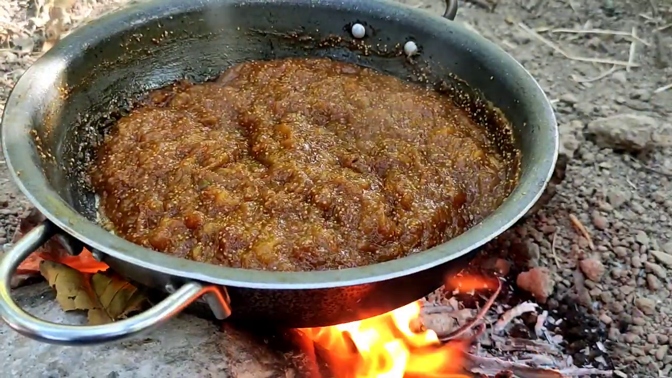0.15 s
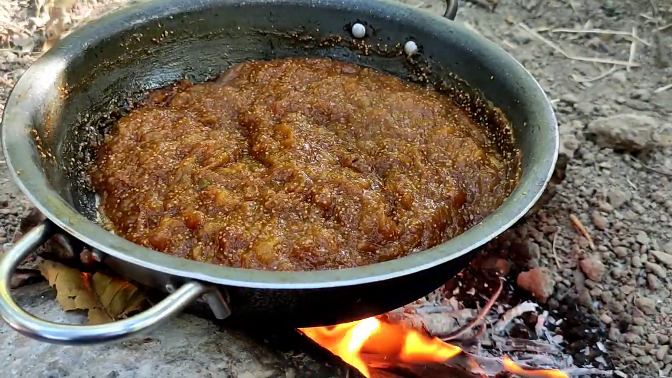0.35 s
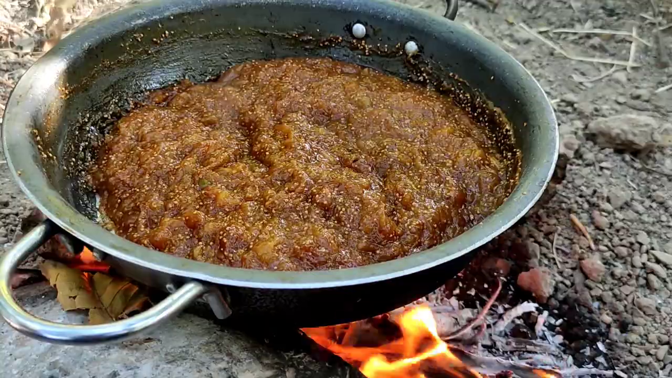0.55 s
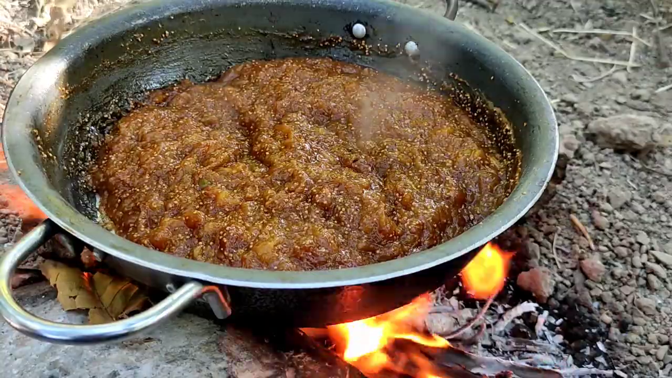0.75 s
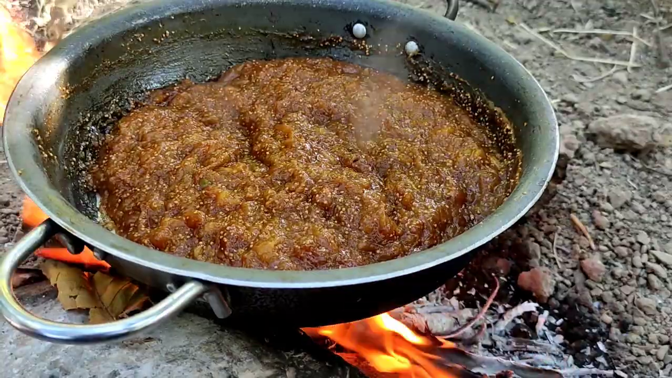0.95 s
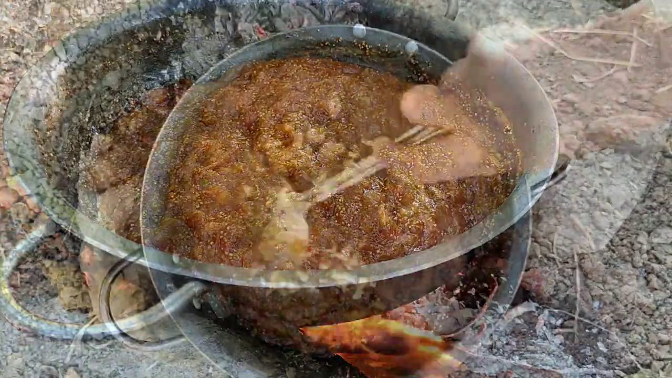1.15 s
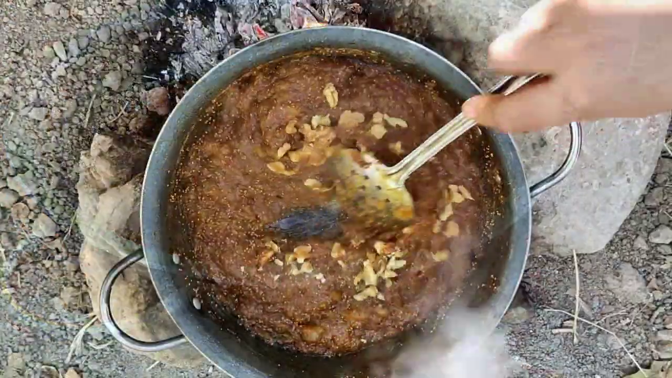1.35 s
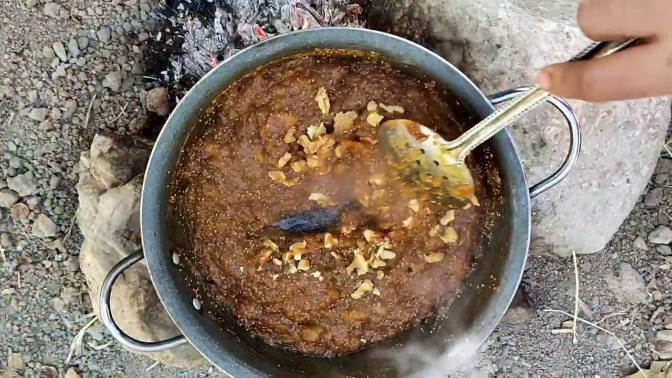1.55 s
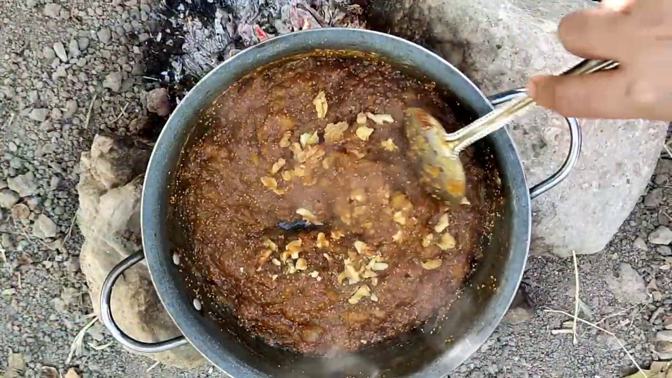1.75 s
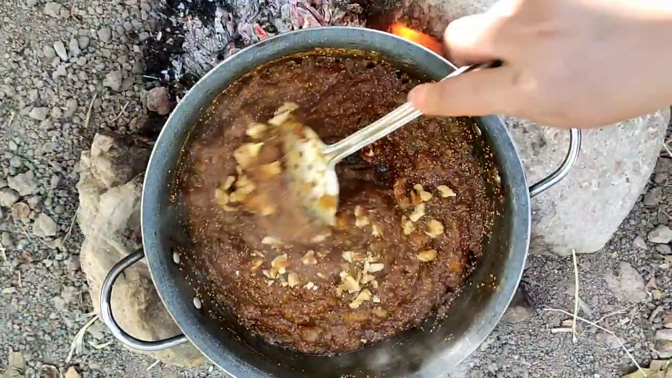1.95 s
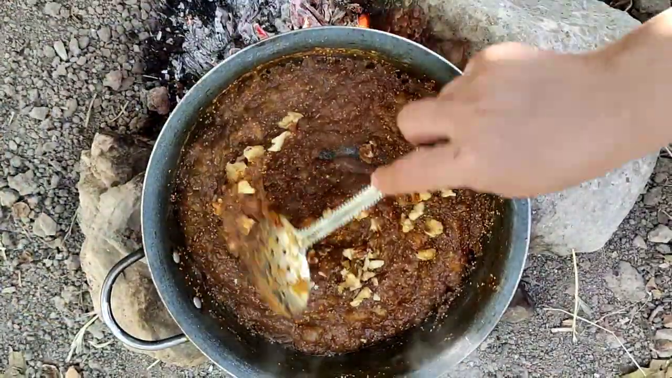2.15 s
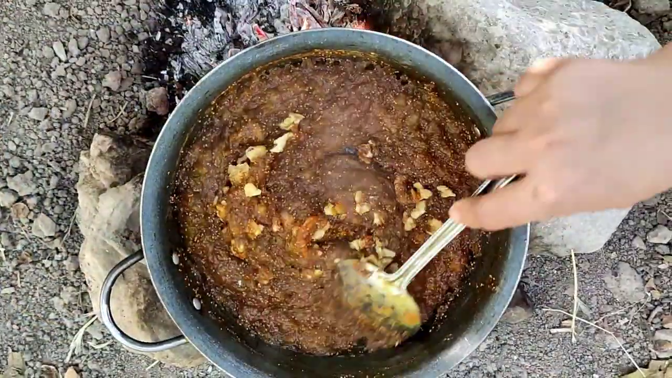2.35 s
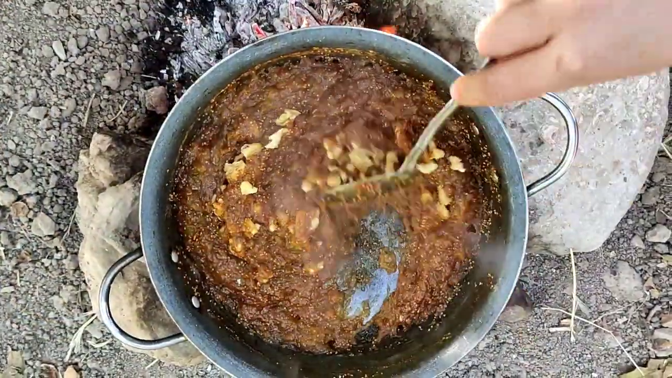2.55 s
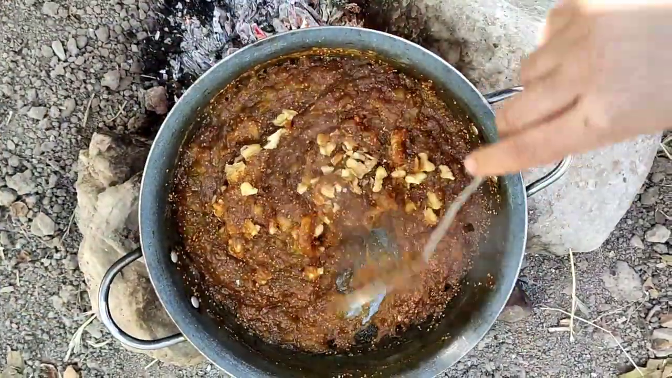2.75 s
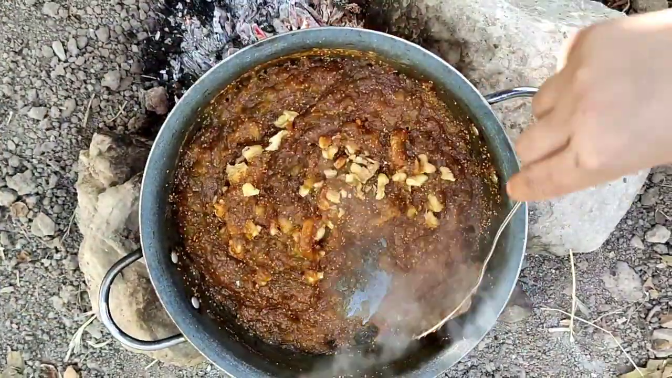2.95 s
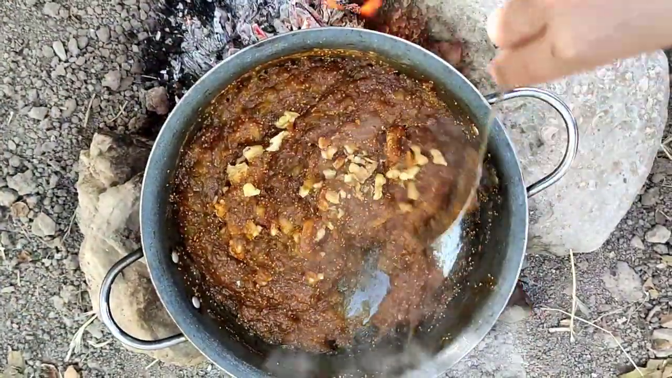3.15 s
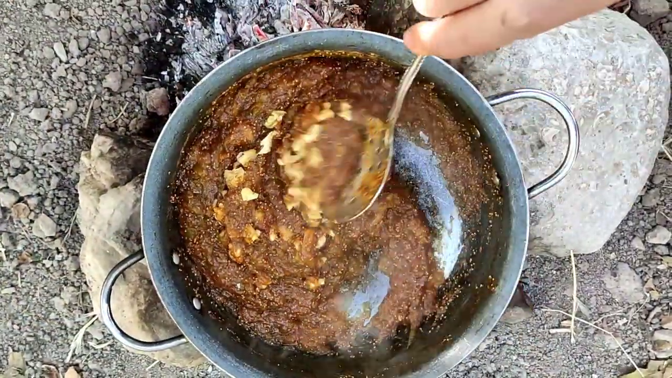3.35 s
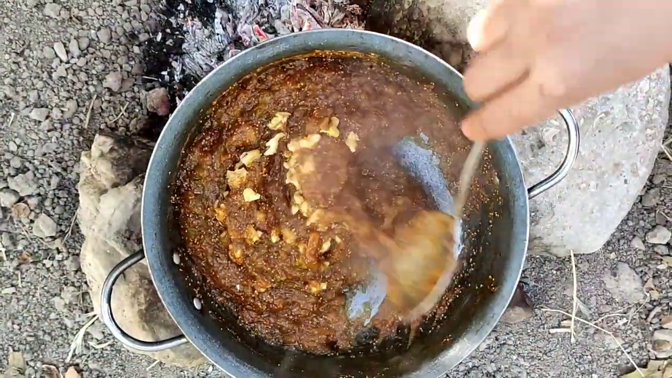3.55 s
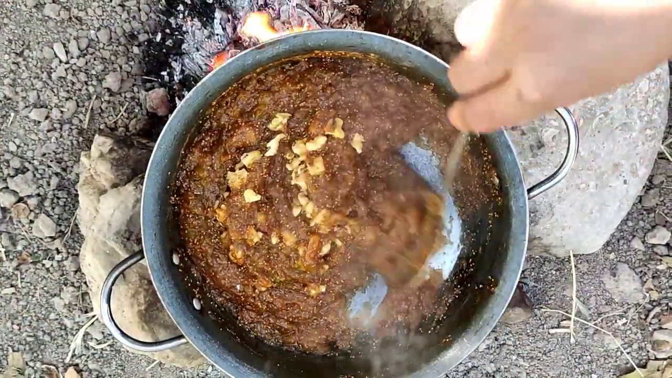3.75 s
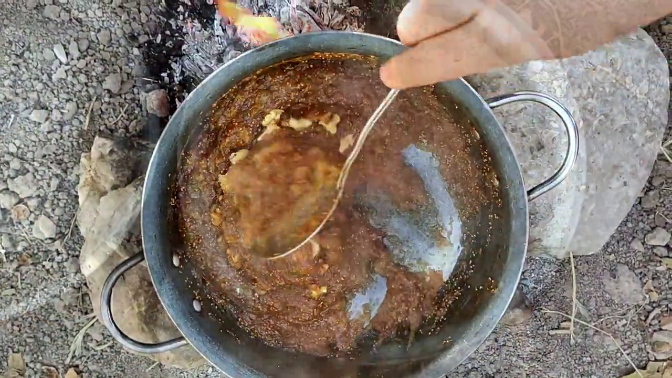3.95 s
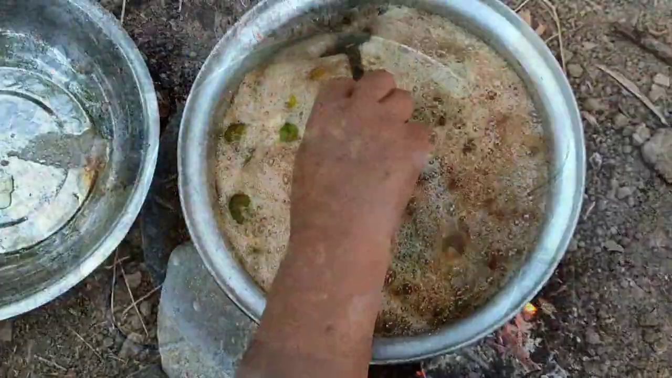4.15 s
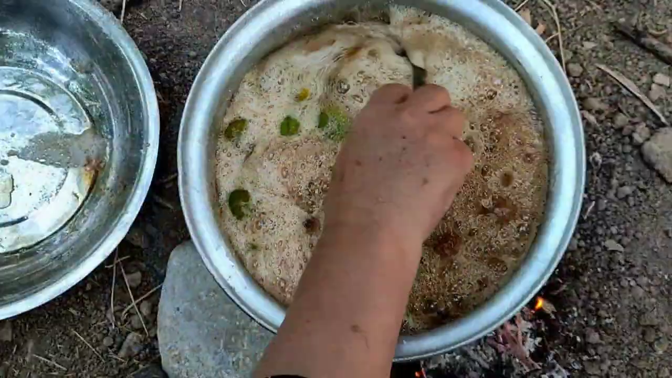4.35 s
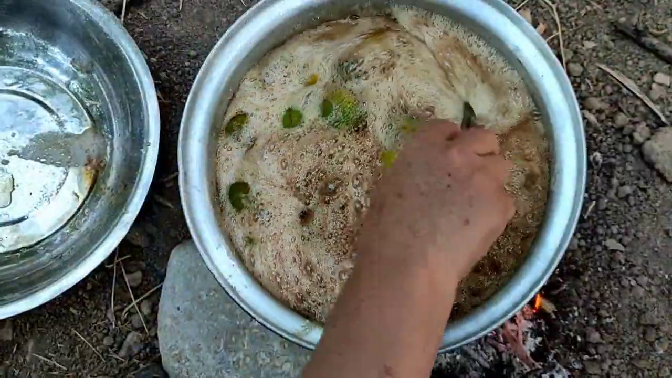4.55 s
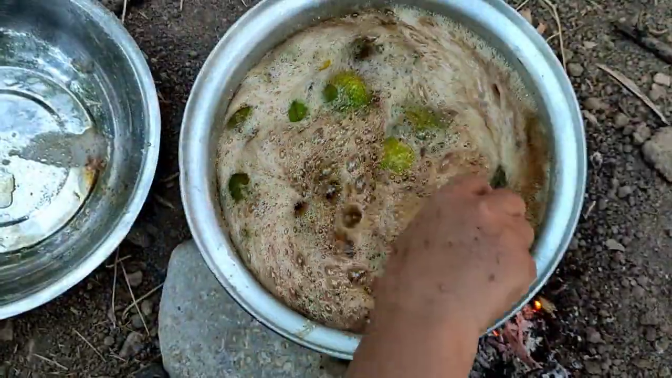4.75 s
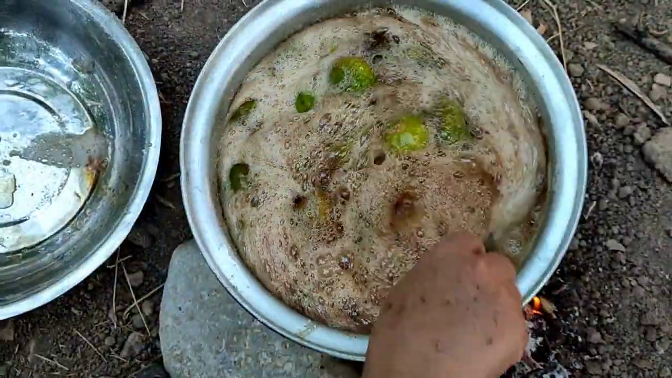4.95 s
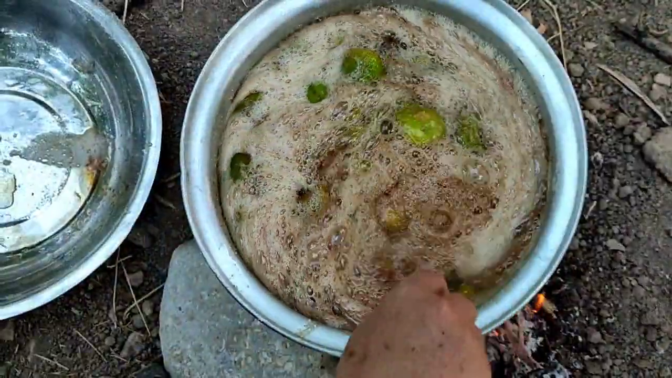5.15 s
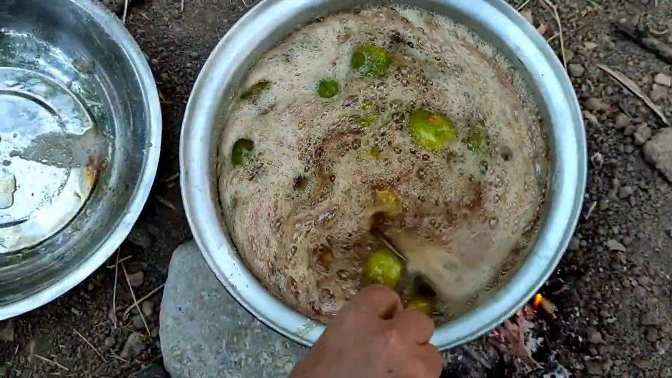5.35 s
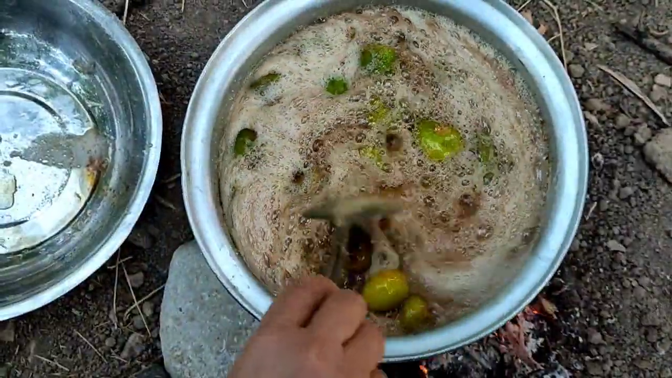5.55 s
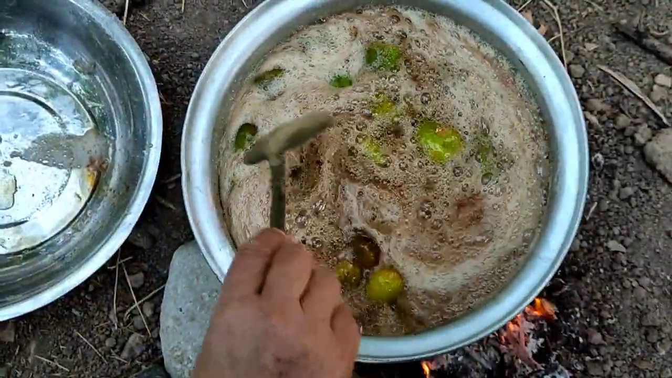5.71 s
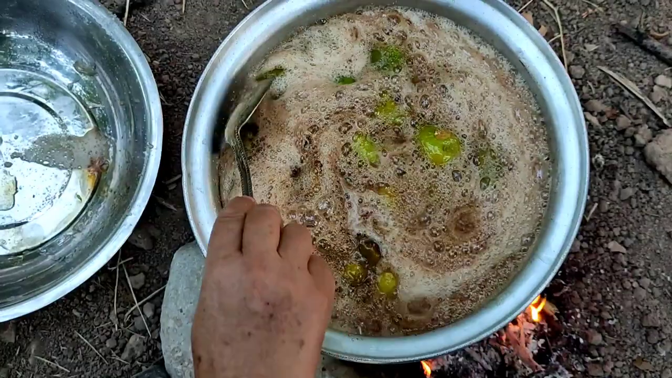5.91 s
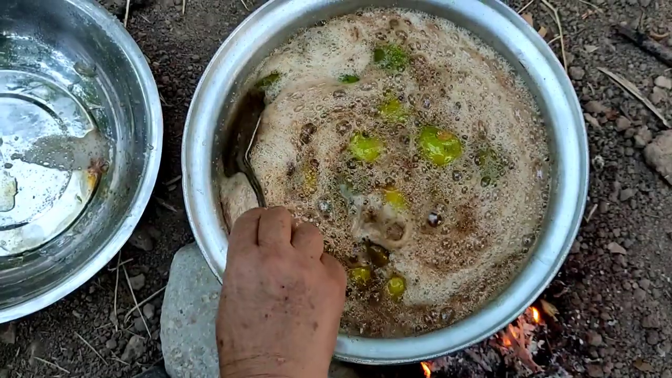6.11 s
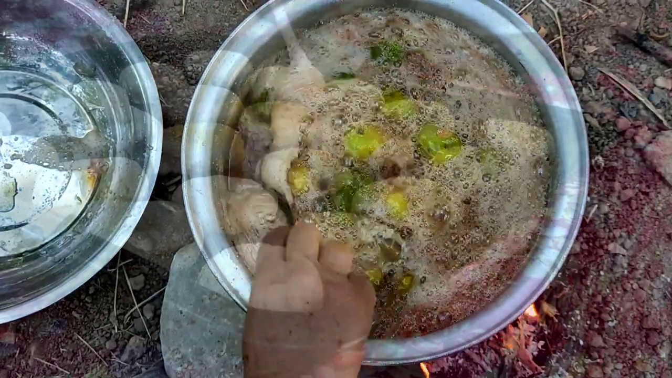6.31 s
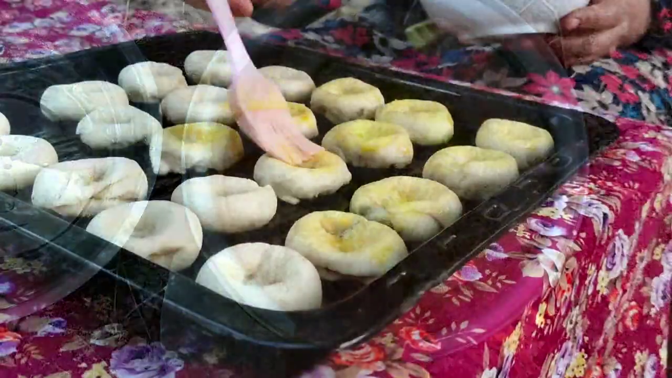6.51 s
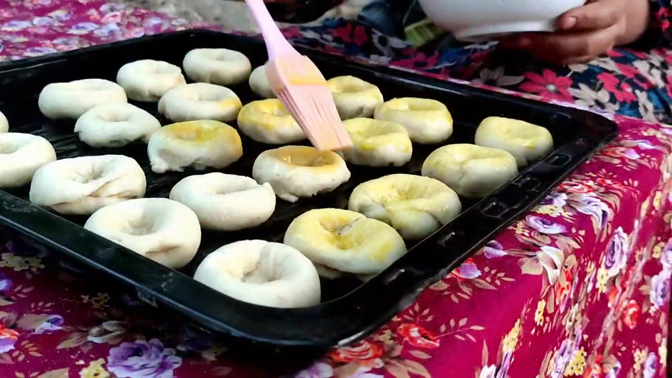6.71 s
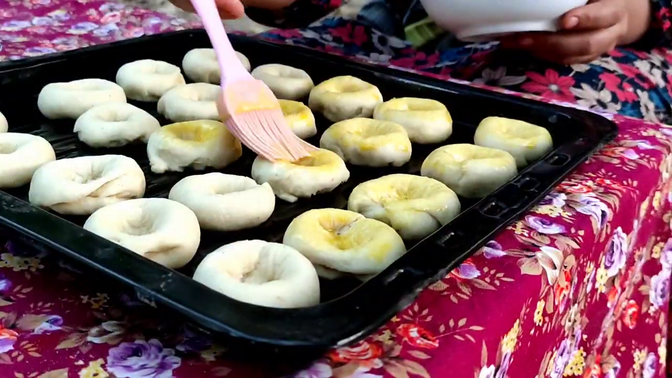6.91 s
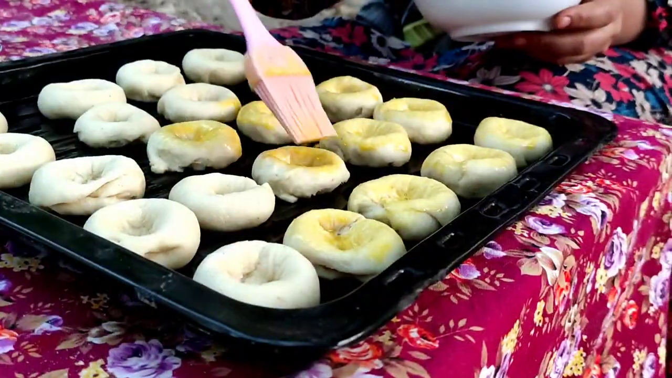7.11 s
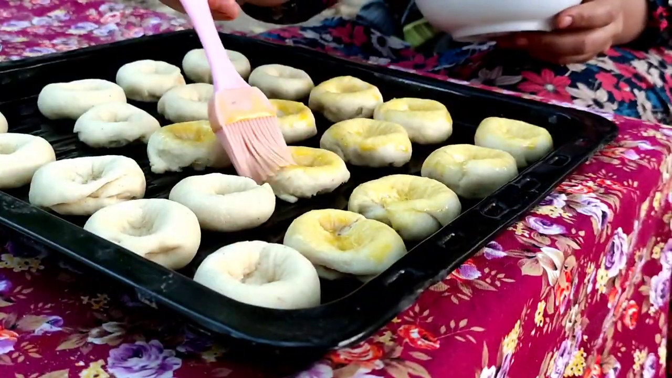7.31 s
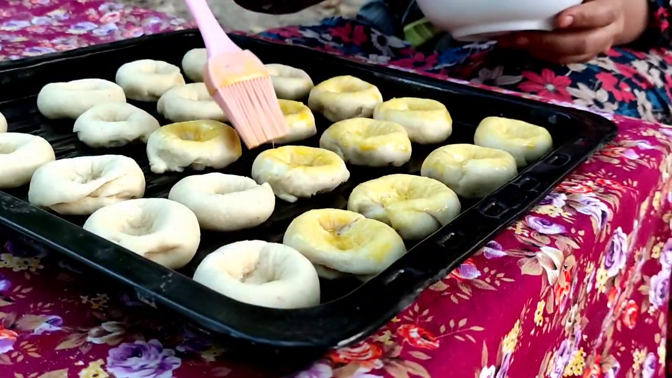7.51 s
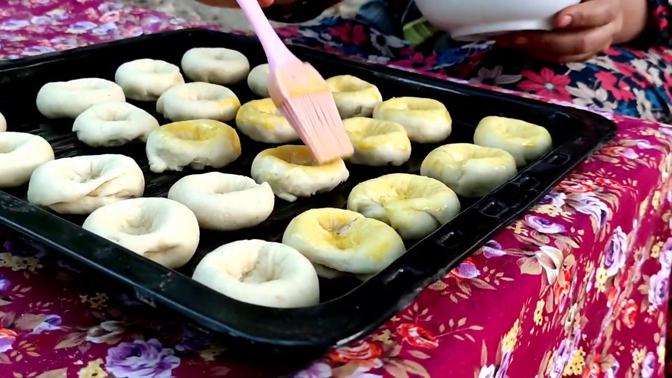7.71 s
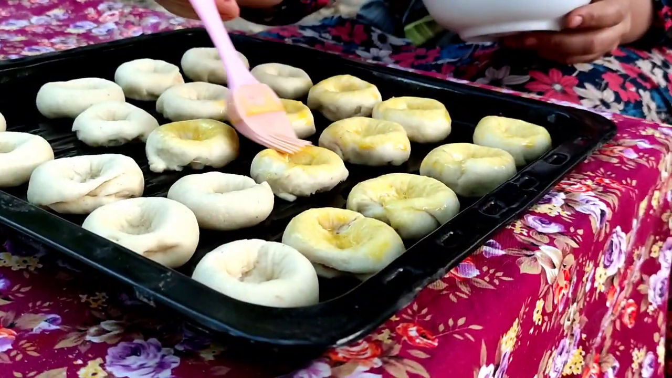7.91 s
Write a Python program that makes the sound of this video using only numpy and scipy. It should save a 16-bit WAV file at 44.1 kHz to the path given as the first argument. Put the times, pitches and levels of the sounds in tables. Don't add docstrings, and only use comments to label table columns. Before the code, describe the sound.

A steady, grainy simmer with low plops and a loud crackle opens, close and dry in open air. Spoon stirring follows: brighter sizzle, short dull thuds with hard metallic edges, rough scrapes and steam squeaks. Next comes softer foam fizz, with quick ticks, knocks and a brief singing rim touch. It ends in a low, barely audible rustle of soft bristles on dough. Near stereo pickup with coarse, watery treble.

```python
import sys
import numpy as np
from scipy import signal
from scipy.fft import rfft, irfft, next_fast_len
from scipy.io import wavfile
from scipy.ndimage import uniform_filter1d

SR = 44100
rng = np.random.default_rng(int(sys.argv[2]) if len(sys.argv) > 2 else 0)


def elevation(decibels):
    levels = np.asarray(decibels, float)
    return 10 ** (levels / 20)


def generate_wav(sig):
    pcm = np.round(np.clip(np.atleast_2d(sig).T, -1, 1) * 32767).astype(np.int16)
    wavfile.write(sys.argv[1], SR, pcm)


N = 355887

# start [s], end [s], fade-in [s], fade-out [s]
STIR_TIMES = (1.2, 4.36, .2, 0.62)
# (pitch [Hz], level [dB per Hz])
STIR_COLOUR = [(18, -68.5), (30, -19), (115, -4), (319, -4), (449, -12.5), (666, 0), (1010, -12),
               (1320, -8), (1960, -13.5), (3220, -7), (6400, -14), (7400, -21), (9000, -13), (12000, -10.5),
               (16000, -29.5)]
FOAM_COLOUR = [(18, -53.5), (30, -21), (98, 2), (355, -3), (526, -9.5), (1040, -14.5), (1910, -19),
               (5170, -18), (5590, -18), (9460, -19), (12000, -20.5), (14800, -23.5), (16000, -46.5)]
# (pitch [Hz], left minus right [dB])
STIR_SIDE = [(60, -2.5), (130, 0), (290, 0), (640, 0.5), (1410, -2), (3100, -3), (6820, 4.5), (15000, 16.5)]
FOAM_SIDE = [(60, 2), (180, -0.5), (550, 0.5), (1650, -0.5), (4970, -3), (15000, 9.5)]
# (pitch [Hz], likeness [1 = same])
LIKENESS = [(40, 0.3), (150, 0.8), (380, 0.8), (950, 0.73), (2380, 0.086), (5980, 0.0), (15000, -0.2)]


def at_hz(points, hz):
    points = np.array(points)
    return np.interp(np.log(hz + 1), np.log(points[:, 0]), points[:, 1])


def drift(rate, size):
    knot_rate = 400
    knots = rng.standard_normal(int(size * knot_rate / SR) + 802)
    r = np.exp(-2 * np.pi * np.clip(rate, 1, 150) / knot_rate)
    slow = signal.lfilter([1], [1, -2 * r, r * r], knots)[800:]
    return np.interp(np.arange(size) * knot_rate / SR, np.arange(len(slow)), slow / slow.std())


def band(x, low_hz, high_hz):
    return signal.sosfilt(signal.butter(2, [low_hz, high_hz], "band", fs=SR, output="sos"), x)


def resonate(x, peaks):
    out = 0
    for k, (hz, width, peak_db) in enumerate(peaks):
        r = np.exp(-1.55 * np.pi * width / SR)
        stage = [1 - r, 0, r - 1, 1, -2 * r * np.cos(2 * np.pi * hz / SR), r * r]
        out = out + (-1) ** k * elevation(peak_db) * signal.sosfilt([stage, stage], x)
    return out


def decay(hz, t60, t):
    return np.sin(2 * np.pi * hz * t) * elevation(-60 * t / t60)


def left_right(noises, hz):
    mid, across = noises
    alike = np.clip(at_hz(LIKENESS, hz), 0, 1)
    return np.sqrt(1 + alike) * mid + np.sqrt(1 - alike) * across * [[1], [-1]]


def swell(t):
    # (centre [s], half width [s], level [dB])
    surges = [(0.019, 0.16, 5), (.64, 0.16, 4.5), (1.55, .15, 2), (1.95, .15, 4), (2.51, 0.16, 4.5),
              (3.248, .11, 11), (3.86, .2, 3), (4.55, 0.17, 3), (5.08, .16, 4), (6.55, .12, 4),
              (7.62, .12, 6), (8.05, 0.1, 5)]
    return sum(db * np.exp(-((t - s) / width) ** 2) for s, width, db in surges)


def view(span, rest, colour, peaks, side, grain_db, patchy_db):
    zones_hz = [170, 800, 3500, 11000]
    start, end, fade_in, fade_out = span
    first, last = int(start * SR), min(int(end * SR), N)
    size = next_fast_len(last - first)
    t, hz = (first + np.arange(size)) / SR, np.fft.rfftfreq(size, 1 / SR)
    gain = elevation(at_hz(colour, hz)) * (hz > 20)
    for peak_hz, width, peak_db in peaks:
        gain *= 1 + (elevation(peak_db) - 1) / (1 + (2 * (hz - peak_hz) / width) ** 2)
    noises = rfft(rng.standard_normal((2, size)) * elevation(grain_db * drift(120, size)))
    lean = elevation(at_hz(side, hz) / 2)
    sound = gain * left_right(noises, hz) * [lean, 1 / lean]

    zone = np.searchsorted([60, 450, 1800, 7000, 15500], hz)
    power = 2 * np.bincount(zone, np.abs(sound.mean(0)) ** 2)[1:5] / size ** 2
    rest_db, follows = np.transpose(rest)[..., None]
    change_db = rest_db + follows * swell(t) - 10 * np.log10(power)[:, None]

    out, together = np.zeros((2, N + size)), drift(3.4, size)
    for centre in 30 * 2 ** np.arange(0, 9.6, .5):
        share = np.clip(1 - 2 * np.abs(np.log2((hz + 1) / centre)), 0, 1)
        place = np.interp(np.log(centre), np.log(zones_hz), range(4))
        level_db = np.clip(1 - np.abs(place - np.arange(4)), 0, 1) @ change_db
        flicker_db = patchy_db * (0.72 * together + drift(14, size))
        out[:, first:first + size] += irfft(sound * share, size) * elevation(level_db + flicker_db)

    clock = np.arange(N) / SR
    rise = np.clip((clock - first / SR) / fade_in + (first == 0), 0, 1)
    fall = np.clip((last / SR - clock) / fade_out + (last > N - 999), 0, 1)
    return out[:, :N] * (rise * fall) ** 0.79


def cracks(hits, middle, bright, middle_db, crack_db, rise):
    force, t = np.full((2, 2, N + 2600), 1e-18), np.arange(2600) / SR
    for s, top_db, mid_db, pan_db in hits:
        t60 = max(.0095 + .00005 * top_db, rise)
        noise = rng.standard_normal((2, 2, len(t))) * (1 - np.exp(-(t / rise) ** 2)) * elevation(-60 * t / t60)
        noise /= np.abs(noise).max(axis=2, keepdims=True)
        noise[..., int(rise * SR)] += 1.5
        levels_db = np.array([[mid_db + 6, mid_db + 8], [top_db + pan_db / 2, top_db - pan_db / 2]])
        at = int(s * SR)
        force[..., at:at + len(t)] += noise * elevation(levels_db)[..., None]
    ring = elevation(middle_db) * resonate(force[0], middle) + elevation(crack_db) * resonate(force[1], bright)
    return ring[:, :N]


def thuds(blows, body, main_t60, contact):
    out, t = np.full(N, 1e-18), np.arange(4000) / SR
    for s, main_db, main_hz, rim_db in blows:
        ring = elevation(main_db) * decay(main_hz, main_t60, t)
        for hz, t60, db, share in body:
            ring += elevation(main_db + db + share * rim_db) * decay(hz, t60, t)
        at = int(s * SR)
        out[at:at + len(t)] -= ring * (1 - np.exp(-t / contact))
    ports = np.array([out, np.roll(out, 3)])
    return band(ports, 215, 2200) * elevation([[-1.3], [1.3]])


def simmering_jam():
    times = (0, 1.32, .1, 0.21)
    # (resting level [dB], share of swells)
    rests = [(-59.5, .5), (-56.5, .01), (-55, .5), (-63.5, 1.1)]
    # (pitch [Hz], level [dB per Hz])
    tint = [(18, -44), (30, -18), (95, 3.5), (336, 1), (486, -11), (760, -6), (1460, -9.5), (1670, -13.5),
            (5450, -15), (6550, -14.5), (9220, -15.5), (10500, -5), (16000, -25.5)]
    # (pitch [Hz], width [Hz], above the colour [dB])
    pan_peaks = [(700, 300, 6), (1480, 110, 6.5), (6470, 470, 6), (10900, 1050, -2), (12000, 430, -3)]
    # (pitch [Hz], left minus right [dB])
    leaning = [(60, 9), (180, -1), (550, 0.5), (1650, -3), (4970, 1.5), (15000, 4.5)]
    return view(times, rests, tint, pan_peaks, leaning, grain_db=0.5, patchy_db=1.0)


def plops(cycles=2.67, glide=0.16):
    # (time [s], peak [dB], pitch [Hz])
    bubbles = [(0.267, -48, 144), (0.285, -52, 180), (0.386, -43.5, 188), (0.445, -53, 207),
               (0.564, -46, 91), (0.896, -49, 131), (1.014, -50, 230), (1.764, -46.5, 188),
               (2.123, -42.5, 307), (2.199, -55, 183), (2.755, -51, 300), (2.889, -47, 270),
               (3.048, -49, 85), (3.395, -45, 132), (3.885, -49, 95), (3.925, -46, 300),
               (3.976, -48.5, 110), (4.075, -47, 310), (4.068, -50.5, 115), (4.175, -53, 234),
               (5.588, -46, 269), (5.64, -50, 145), (5.831, -51, 112)]
    out, t = np.zeros((2, N)), np.arange(1800) / SR
    for s, peak_db, hz in bubbles:
        phase = hz * t
        tone = np.sin(2 * np.pi * phase * (1 + glide * phase / 4))
        pulse = tone * np.sin(np.pi * np.clip(phase / cycles, 0, 1)) ** 2
        lean_db = rng.normal(0, 2.9) * np.array([[1], [-1]])
        at = int((s + 0.0033) * SR)
        out[:, at:at + len(t)] -= elevation(peak_db + 1.5 + lean_db) * pulse
    return out


def pan_knocks():
    # (time [s], crack peak [dB], middle [dB], left minus right [dB])
    snaps = [
        (0.6797, -20, -45, 9),
        (1.0171, -38, -51, 7),
        (1.1047, -35, -53, 7),
        (2.2805, -34, -78, 13),
        (2.4917, -35, -50, 12),
        (2.6805, -30, -52, 20),
        (2.768, -40, -42, 5),
    ]
    # (pitch [Hz], width [Hz], level [dB])
    middle_ring = [(2400, 190, -15), (2990, 260, -0.6), (3800, 330, 2.5), (6640, 200, -9)]
    bright_ring = [(7880, 120, -6.5), (9990, 690, -2.5), (10340, 240, -0.5), (11880, 790, -2.5),
                   (13200, 730, -13.5), (14300, 500, -35)]
    # (time [s], main tone peak [dB], main tone [Hz], nearness to the rim [dB])
    spoon_blows = [
        (1.849, -19, 760, -6),
        (1.88, -36, 780, -1),
        (1.943, -38, 746, 1),
        (2.369, -31, 760, -8),
        (2.493, -50, 624, 17),
        (2.579, -31.5, 743, 8),
        (2.874, -40.5, 620, 7),
        (3.0546, -12, 680, -1.5),
        (3.107, -30, 636, -4),
        (3.754, -12, 693, 8.5),
    ]
    # (pitch [Hz], t60 [s], against main tone [dB], share of rim nearness)
    body_tones = [(372, 0.036, -8.5, .25), (570, 0.018, -5.5, -.2), (1342, 0.014, -8.5, 1.01),
                  (1670, 0.017, -21, 1.48)]
    out = thuds(spoon_blows, body_tones, main_t60=0.027, contact=0.00069)
    return out + cracks(snaps, middle_ring, bright_ring, middle_db=11.5, crack_db=9, rise=0.000905)


def stirred_pan():
    # (resting level [dB], share of swells)
    rests = [(-61, 0.36), (-56, 0.82), (-59.5, 1.18), (-54.5, 0.84)]
    # (pitch [Hz], width [Hz], above the colour [dB])
    pan_peaks = [(730, 190, 3.3), (1360, 170, 4.3), (1697, 64, 4.3), (3890, 580, 2.5), (10340, 300, 0.91),
                 (12000, 130, 3.6)]
    return view(STIR_TIMES, rests, STIR_COLOUR, pan_peaks, STIR_SIDE, grain_db=1.0, patchy_db=2.0)


def spurts():
    # (centre [s], half length [s], level [dB], pitch [Hz], left minus right [dB])
    puffs = [(1.375, .03, -58, 10000, 6), (1.43, .04, -58, 12500, 12), (1.56, .03, -58, 13500, 14),
             (1.6, .07, -60, 3900, -2), (1.775, .015, -57, 12000, 12), (1.89, .03, -55, 9500, 6),
             (1.95, .02, -58, 13000, 12), (2.06, .02, -56, 12300, 12), (2.1, .03, -59, 4200, -2),
             (3.237, .028, -44, 4150, -2), (3.345, .005, -47, 600, -2), (3.9, .006, -48, 760, -2),
             (4.0, .12, -59, 230, 0), (3.2, .02, -52, 11500, 12), (4.412, .008, -60, 6200, 0),
             (4.85, .08, -62, 4300, -2)]
    out, t = np.zeros((2, N)), np.arange(-8000, 8000) / SR
    for s, half, level_db, hz, pan_db in puffs:
        puff = resonate(rng.standard_normal((2, len(t))), [(hz, .15 * hz, 0)])
        ports_db = level_db + pan_db * np.array([[.5], [-.5]])
        at = int(s * SR) - len(t) // 2
        out[:, at:at + len(t)] += puff / puff.std() * np.exp(-(t / half) ** 2) * elevation(ports_db)
    return out


def hard_knocks():
    # (time [s], level [dB], rattle [dB], rattle t60 [s])
    touches = [
        (1.8495, -4, -20, .006),
        (3.0546, -1.5, -19, .005),
        (3.754, -4.5, -16, .007),
        (5.3336, -1, -25, .007),
        (5.9314, -2, -22, .006),
    ]
    # (pitch [Hz], width [Hz], left [dB], right [dB])
    pan_walls = [
        [(2300, 250, -12, 0), (3050, 400, -8, -3), (3900, 300, -8, -5), (5600, 900, -8, -18),
         (8000, 400, -8, -14), (11800, 1500, -10, -26)],
        [(1600, 300, 0, -6), (2200, 250, -15, 0), (2850, 250, 0, -6), (3410, 250, 2, 3), (4380, 400, 3, -4),
         (5400, 600, 2, -8), (6750, 350, 2, -5), (7900, 300, 2, 0), (8300, 250, -6, 3), (9500, 350, 7, 0),
         (11000, 600, 5, -18), (12000, 200, 12, -20), (13000, 500, -8, -15)],
        [(3000, 350, 6, 13), (3800, 450, 9, 9), (4900, 250, -2, -6), (5400, 250, -6, -2), (6680, 240, 12, 6),
         (7990, 220, 11, 8), (8400, 200, 6, 8), (9100, 200, 3, 6), (10000, 250, 13, 12), (10500, 300, 18, 8),
         (11900, 300, 19, 0), (12400, 250, 15, 5), (13200, 250, 13, -5), (14300, 300, -20, 2)],
    ]
    pot_walls = [
        [(1500, 400, -3, 0), (2350, 400, -10, -4), (3070, 350, -8, -1), (3700, 400, -6, -8),
         (4700, 900, -8, -8), (6570, 400, -8, 2), (7900, 500, 3, 4), (8720, 300, 5, 8), (9630, 300, 8, 0),
         (10800, 500, 11, -15), (11700, 600, 8, -15), (12700, 400, 5, -12), (13700, 400, 0, -25),
         (14900, 400, 2, -22)],
        [(1300, 250, 0, 4), (1800, 250, -3, 3), (2690, 200, -1, 1), (3400, 300, 10, 4), (3850, 200, 3, 5),
         (4480, 200, 0, 7), (6400, 500, -5, 6), (7260, 250, -3, 9), (8890, 300, 5, -8), (10100, 500, 3, -12),
         (11700, 500, 0, -12), (13000, 500, 0, -12), (14500, 700, -5, -35)],
    ]
    lead_in_s, lead_in_db = .002, -18
    out, lead = np.zeros((2, N)), int(lead_in_s * SR)
    t = np.arange(-lead, 2000) / SR
    for (s, level_db, rattle_db, t60), wall in zip(touches, pan_walls + pot_walls):
        shape_db = np.where(t < 0, -lead_in_db * t / lead_in_s - 4, -60 * t / t60)
        force = elevation(rattle_db + shape_db) * rng.standard_normal(len(t)) + 1e-18
        force[lead] = -1
        for port in range(2):
            peaks = [(row[0], row[1], row[2 + port] + level_db) for row in wall]
            at = int(s * SR) - lead + port * 2
            out[port, at:at + len(t)] += resonate(force, peaks)
    return out


def skids():
    # (time [s], length [s], level [dB], tilt [dB per octave])
    scrapes = [(2.046, 0.043, -44, 4), (2.49, 0.17, -45, 3.5), (2.76, 0.04, -50, 1.5), (3.124, 0.1, -46, 3),
               (3.2, 0.049, -42.5, 1.5), (3.342, 0.025, -41, 6.5), (3.812, 0.045, -33, 2.5),
               (4.53, .035, -58, 3), (4.759, 0.016, -52, 1.5), (4.775, 0.15, -52, 1.5),
               (5.333, 0.036, -49, 4.5), (5.969, .018, -41, 3.5), (6.027, 0.0091, -42.5, 4.5),
               (6.04, 0.055, -49, 3.5), (6.323, 0.098, -51.5, 4), (6.998, 0.053, -65.5, 3),
               (7.564, 0.077, -52.5, -2), (7.772, 0.07, -60.5, 4)]
    out, t = np.zeros((2, N + 8192)), np.arange(8192) / SR
    hz = np.fft.rfftfreq(len(t), 1 / SR)
    # colour, side, lowest tone [Hz], left minus right [dB]
    pan = (STIR_COLOUR, STIR_SIDE, 365, -1)
    pot = (FOAM_COLOUR, FOAM_SIDE, 150, -1.5)
    for s, length, level_db, tilt_db in scrapes:
        colour, side, low_hz, pan_db = pan if s < STIR_TIMES[1] else pot
        shape_db = at_hz(colour, hz) + tilt_db * np.log2(hz / 4000 + 0.029)
        shape_db = shape_db + (at_hz(side, hz) + pan_db) * [[.5], [-.5]]
        ratio = low_hz / (hz + 1)
        body = 1 / np.abs(1 - ratio ** 2 + .55j * ratio) ** 2
        noises = rfft(rng.standard_normal((2, len(t))))
        noise = irfft(left_right(noises, hz) * elevation(shape_db) * body)
        stroke = np.clip(t / (0.15 * length), 0, 1) * elevation(-7 * (t / length) ** 4)
        stroke = stroke * elevation(1.63 * drift(150, len(t)))
        at = int(s * SR)
        out[:, at:at + len(t)] += elevation(level_db) * stroke * noise / noise.mean(0).std()
    return out[:, :N]


def drags():
    # (time [s], length [s], level [dB])
    pulls = [
        (3.09, 0.05, -42.5),
        (3.148, 0.064, -36.5),
        (3.225, 0.055, -47),
    ]
    # (pitch [Hz], width [Hz], level [dB])
    floor_tones = [(372, 55, 1), (592, 74, -4), (739, 76, -1), (1340, 150, -15)]
    t, slips_per_s = np.arange(N) / SR, 600
    slips = (rng.random(N) < slips_per_s / SR) * rng.standard_normal(N) + 1e-18
    press = sum(elevation(db) * elevation(-6 * (2 * (t - s) / length - 1) ** 4) for s, length, db in pulls)
    return resonate(slips * press, floor_tones) / resonate(slips, floor_tones).std()


def foaming_pot():
    times = (4.12, 6.58, 0.26, 0.25)
    # (resting level [dB], share of swells)
    rests = [(-60, .8), (-64, 0.69), (-64, .2), (-67.5, .4)]
    # (pitch [Hz], width [Hz], above the colour [dB])
    pot_peaks = [(326, 35, 2.46), (5300, 60, 1.7), (11800, 590, 2)]
    return view(times, rests, FOAM_COLOUR, pot_peaks, FOAM_SIDE, grain_db=2.5, patchy_db=2.0)


def pot_knocks():
    # (time [s], crack peak [dB], middle [dB], left minus right [dB])
    ticks = [(4.364, -37.5, -60, 13), (4.5294, -44, -51.5, 12), (4.575, -38, -46, 10),
             (4.7655, -36.5, -41, 14), (4.972, -38.5, -52, 18), (5.0509, -31, -50, 4),
             (5.1073, -33, -49, 9.5), (5.3345, -20, -36, 11), (5.6944, -39, -68, -2.5),
             (5.7665, -39, -65, 3.5), (5.8164, -29.5, -58, 5), (5.9723, -34.5, -52, 5),
             (6.0084, -38, -47, 10), (6.0292, -35, -48, 5.0), (6.1384, -35.5, -58, 8),
             (6.1956, -39.5, -51, 13.5), (6.2337, -41, -54, 8), (6.331, -50, -38, -2), (6.555, -54, -48, 3),
             (6.6298, -46, -57, 8), (6.8348, -43, -62.5, 6)]
    # (pitch [Hz], width [Hz], level [dB])
    middle_ring = [(2460, 480, -6), (3470, 600, 0.5), (4730, 1350, -9), (6840, 1200, -0.5)]
    bright_ring = [(8050, 900, 0.5), (10200, 1100, 0), (11700, 1400, 0.5), (13400, 2200, -4)]
    # (time [s], main tone peak [dB], main tone [Hz], nearness to the rim [dB])
    spoon_blows = [
        (4.346, -44.5, 378, -18),
        (4.568, -33.5, 410, 2),
        (4.688, -45, 261, 4),
        (5.333, -26, 325, 1.5),
        (5.931, -30, 215, -25),
        (5.932, -24, 427, 0.6),
        (5.9325, -28, 680, -8),
        (6.329, -26.5, 270, -5),
        (6.556, -41, 328, -2.5),
        (6.641, -46, 262, 3),
    ]
    # (pitch [Hz], t60 [s], against main tone [dB], share of rim nearness)
    body_tones = [(647, 0.03, -16, -.05), (890, 0.011, 1.5, 1.05), (1590, 0.008, -7, .7)]
    out = thuds(spoon_blows, body_tones, main_t60=0.03, contact=0.00043)
    return out + cracks(ticks, middle_ring, bright_ring, middle_db=5, crack_db=0.6, rise=0.00095)


def handle():
    # (time [s], peak [dB])
    rim_touches = [
        (5.9312, -20.5),
        (5.966, -42),
        (5.9735, -33),
        (5.9795, -38),
        (5.985, -45),
        (6.009, -44),
        (6.0305, -43),
        (6.041, -48),
    ]
    # (pitch [Hz], level [dB], t60 [s])
    handle_tones = [(5316, 1.5, 0.048), (5420, -11, .04), (5530, -15, .04), (5100, -15, 0.032),
                    (2700, -14, 0.025), (3450, -12, 0.02), (10100, -18, .025)]
    out, t = np.zeros(N), np.arange(8000) / SR
    ring = sum(elevation(level_db) * decay(hz, t60, t) for hz, level_db, t60 in handle_tones)
    ring = ring * (1 - np.exp(-t / 0.00085))
    for s, peak_db in rim_touches:
        at = int(s * SR)
        out[at:at + len(t)] += elevation(peak_db) * ring
    return out * elevation([[-4], [4]] + 2.5 * drift(150, N))


def brushed_dough():
    times = (6.36, 8.07, 0.16, .1)
    # (resting level [dB], share of swells)
    rests = [(-66.5, .4), (-69.5, .4), (-70, 1.1), (-74, .4)]
    # (pitch [Hz], level [dB per Hz])
    tint = [(18, -64), (30, -21), (118, 4), (295, -9), (364, -12.5), (404, -15.5), (684, -26),
            (2230, -34.5), (6050, -33.5), (8300, -28.5), (16000, -34.5)]
    # (pitch [Hz], left minus right [dB])
    leaning = [(60, -2), (240, -0.4), (950, 2.5), (3770, 0), (15000, 3)]
    return view(times, rests, tint, [], leaning, grain_db=0.0, patchy_db=1.2)


def scene():
    jam = simmering_jam() + plops() + pan_knocks()
    stirring = stirred_pan() + spurts() + hard_knocks() + skids() + drags()
    pot = foaming_pot() + pot_knocks() + handle()
    return jam + stirring + pot + brushed_dough()


def camera_store(x, wander_db=8, attack_db=17):
    # (pitch [Hz], step against the local level [dB])
    coarseness = [(300, -20), (1000, -10), (2000, -3), (4500, 1), (7000, 2), (11000, -.5), (14000, 2),
                  (15500, 9)]
    # (pitch [Hz], spread [dB])
    warble = [(600, 0), (1500, 1.5), (3000, 5), (7000, 8), (15000, 6.5)]
    offset, size, stored_bins, attack_bins = 838, 1024, 722, 766
    n, k = np.arange(2 * size)[:, None], np.arange(size)
    hz = k * SR / 2 / size
    window = np.sin(np.pi * (n + .5) / (2 * size))
    basis = window * np.cos(np.pi / size * (n + .5 + size / 2) * (k + .5)) * np.sqrt(2 / size)
    lead = 2 * size - offset
    blocks = np.pad(x, [(0, 0), (lead, 3 * size - (N + lead) % size)]).reshape(2, -1, size)
    frames = np.concatenate([blocks[:, :-1], blocks[:, 1:]], axis=2)
    plain = frames @ basis

    flutter = rng.standard_normal((frames.shape[1], size // 4))
    flutter = 3 ** .5 * uniform_filter1d(flutter, size=3, axis=0)
    flutter = np.where(flutter > 0, 1.3 * np.tanh(flutter / 1.3), 1.4 * flutter)
    loud_db = 10 * np.log10((frames ** 2).mean((0, 2)) + 1e-16)
    flutter *= np.clip((loud_db[:, None] + 80) / 28, .5, 1.1)
    gain = elevation(at_hz(warble, hz) * np.repeat(flutter, 4, axis=1))
    lines = plain * gain / np.sqrt((gain ** 2).mean(0))

    level_db = 10 * np.log10((lines.reshape(2, -1, 128, 8) ** 2).mean(3) + 1e-16)
    nearby_db = uniform_filter1d(uniform_filter1d(level_db, size=9, axis=2), size=3, axis=1)
    wander = uniform_filter1d(rng.standard_normal((len(flutter), 64)), size=4, axis=0)
    nearby_db += wander_db * 2 * wander.repeat(2, axis=1)
    step = elevation(np.repeat(nearby_db, 8, axis=2) + at_hz(coarseness, hz))
    rounded = np.sign(lines) * step * np.floor(np.abs(lines) / step + .42) * (k < stored_bins)

    jumps = np.diff(frames, axis=2) ** 2
    calm = (jumps.max(2) < elevation(attack_db) ** 2 * jumps.mean(2)).all(0)
    frames = np.where(calm[:, None], rounded, plain * (k < attack_bins)) @ basis.T
    out = frames[:, 1:, :size] + frames[:, :-1, size:]
    return out.reshape(2, -1)[:, lead - size:lead - size + N]


def band_limit(x):
    return signal.sosfilt(signal.butter(12, 16810, fs=SR, output="sos"), x)


def record(dry):
    mix = camera_store(dry)
    return band_limit(mix)


dry = scene()
out = record(dry)
generate_wav(out)
```